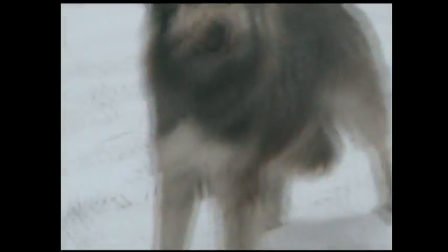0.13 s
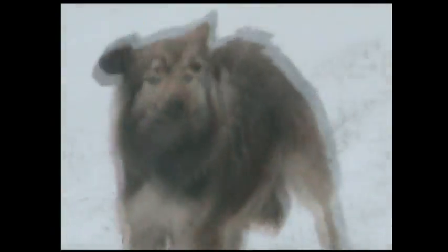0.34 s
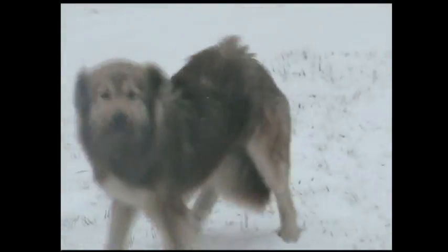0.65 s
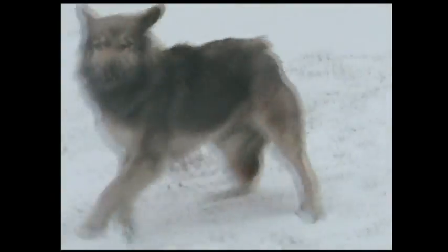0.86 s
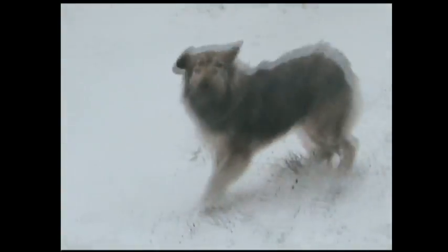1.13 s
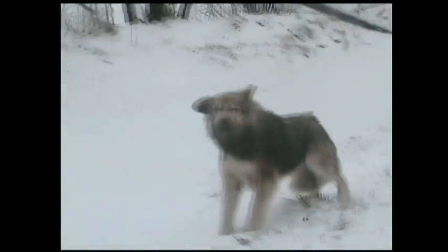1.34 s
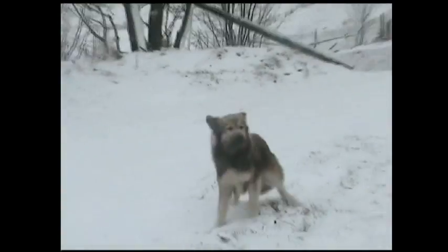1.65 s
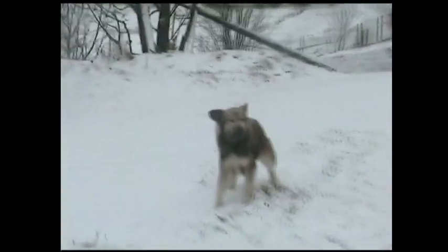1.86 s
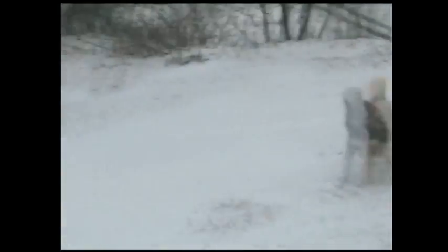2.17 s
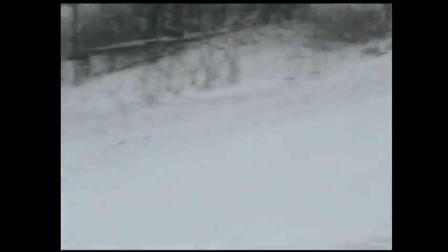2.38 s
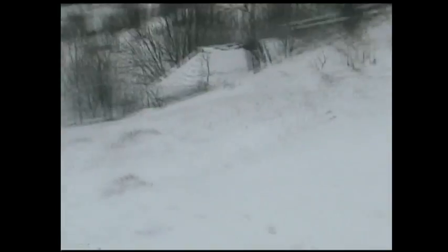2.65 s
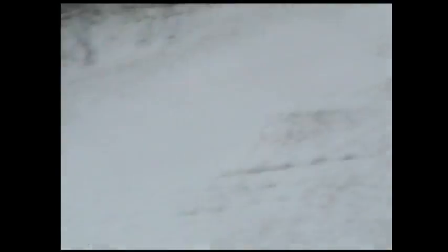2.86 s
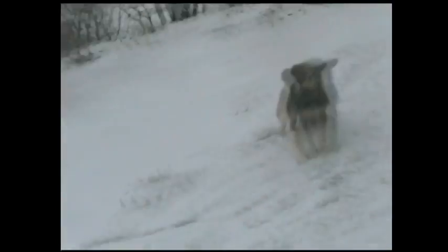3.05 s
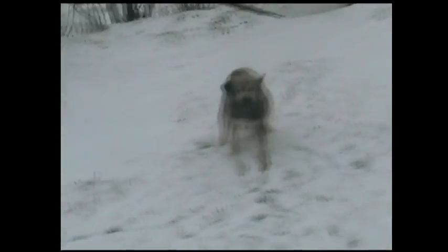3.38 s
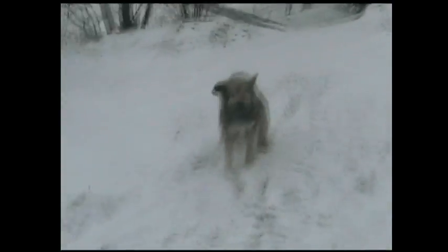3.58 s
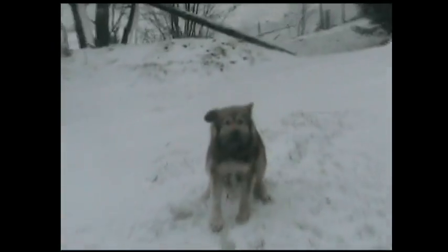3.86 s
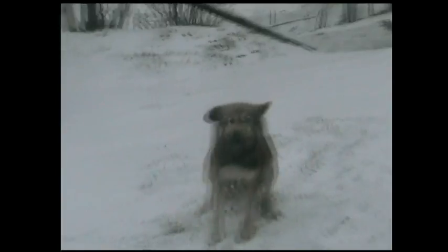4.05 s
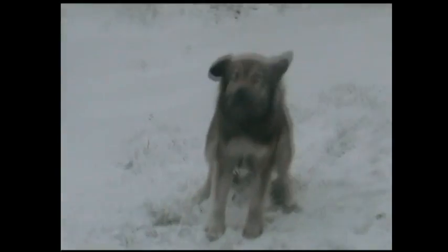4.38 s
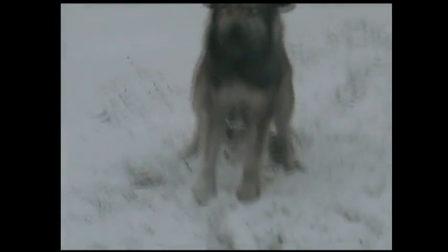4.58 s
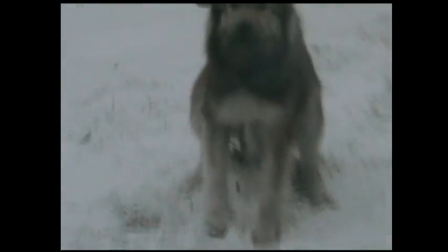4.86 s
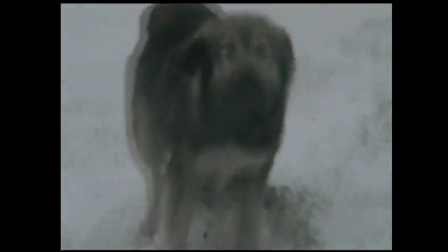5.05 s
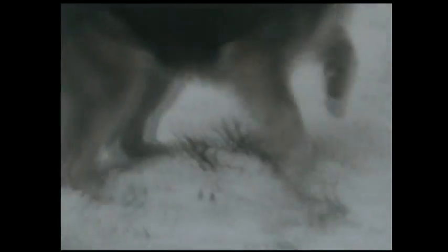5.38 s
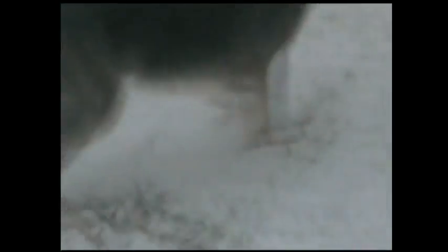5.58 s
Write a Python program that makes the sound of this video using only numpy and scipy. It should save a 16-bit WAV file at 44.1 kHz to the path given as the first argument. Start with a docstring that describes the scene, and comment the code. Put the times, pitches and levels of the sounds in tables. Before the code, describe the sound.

Close, dry outdoor sound on a snowy slope, through a small handheld camera microphone. A low moan leads straight into a hoarse, throaty bark at 0.1 s. The same big dog barks again at about 0.9, 1.8, 2.8, 3.5, 4.5 and 5.3 s, each a fifth of a second or less, pitch jumping up and falling, with a gritty edge. Quiet growls rumble near 1.2 to 1.9, 2.3 to 2.8 and 3.9 to 4.3 s; a soft moan precedes the 4.5 s bark. A clearer-voiced second dog fires six quick barks from 2.2 to 3.5 s, overlapping the first, with a soft yelp-like ring near 2.6 s. Paws crunch lightly in snow, and scattered ticks and knocks sound. Wind rumbles low, with a strong buffet at 3.1 s. Faint hiss and thin motor whine duck under the barks; echoes are weak and dull.

```python
"""Snowy slope: two large dogs bark in volleys, growl and moan a few metres from a hand-held camera. Voices are
fold pulses and breath noise through throat resonances; snow, fence and slope return echoes. Paws crunch (noise
crackle), wind rumbles in both microphone ports (shaped noise), short ringing noise bursts make ticks, knocks,
bright crackles and one soft yelp-like ring, and the camera drive whines (steady tones); gain control lowers the
whole sound after loud moments."""
import sys
import numpy as np
from scipy import signal
from scipy.io import wavfile
from scipy.ndimage import uniform_filter1d

SR = 44100
rng = np.random.default_rng(int(sys.argv[2]) if len(sys.argv) > 2 else 0)


def output_pcm(signal):
    """Save a mono or channel-first signal as 16-bit PCM at the path in sys.argv[1].

    Samples are clipped to [-1, 1] before scaling.
    """
    pcm = np.clip(np.atleast_2d(signal).T, -1, 1) * 32767
    wavfile.write(sys.argv[1], SR, np.round(pcm).astype(np.int16))


N = 252252


def gain_of(db):
    """Decibels to gain."""
    return 10 ** (np.asarray(db) / 20)


def evened(x):
    """Scales to rms 1."""
    return x / np.sqrt(np.mean(x ** 2) + 1e-20)


def steady(x):
    """Evens the loudness over 20 ms."""
    return x / np.sqrt(uniform_filter1d(x ** 2, size=900, mode="reflect") + 1e-9)


def slow_noise(n, size):
    """Noise smoothed over size samples, rms 1."""
    return evened(uniform_filter1d(rng.standard_normal(n), size=size))


def read(points, hz):
    """Reads a spectrum on a log-frequency axis."""
    f, value = np.transpose(points)
    return np.interp(np.log(hz + 1), np.log(f + 1), value)


def since(start_s, curve):
    """Columns of a curve with its times counted from start_s."""
    times, values = np.transpose(curve)
    return times - start_s, values


def add(mix, start_s, sound):
    """Mixes a sound in at start_s."""
    part = mix[..., round(max(start_s, 0) * SR):][..., :sound.shape[-1]]
    part += sound[..., :part.shape[-1]]


def resonate(x, hz, width_hz):
    """Shifts the curve hz down to zero, smooths twice, shifts back: a steep resonance."""
    turn = np.exp(2j * np.pi * np.cumsum(hz * np.ones(len(x))) / SR)
    r = np.exp(-np.pi * width_hz / SR)
    smoothed = signal.lfilter([(1 - r) ** 2], [1, -2 * r, r * r], x / turn + 1e-18)
    return 2 * (turn * smoothed).real


def tract(drive, modes, mouth):
    """Parallel resonances of alternating sign, moved by the mouth."""
    total = 0
    for k, (hz, width_hz, db) in enumerate(modes):
        total = total + (-1) ** k * gain_of(db) * resonate(drive, hz * mouth, width_hz)
    return total


def coloured(points, same, patchy_db, size):
    """Stereo noise from random short-time spectra with drifting patches; same = port correlation."""
    frames, hz = 4 * N // size + 5, np.fft.rfftfreq(size, 1 / SR)
    a, b, c, d, patches = rng.standard_normal((frames, len(hz), 5)).T
    patches = uniform_filter1d(patches, size=6, axis=0)
    patches = evened(uniform_filter1d(patches, size=6, axis=1))
    left, same = a + 1j * b, np.clip(same, 0, 1)
    right = same * left + np.sqrt(1 - same ** 2) * (c + 1j * d)
    spectra = np.array([left, right]) * gain_of(read(points, hz)[:, None] + patchy_db * patches)
    return evened(signal.istft(spectra, nperseg=size, noverlap=size * 3 // 4)[1][:, :N])


def panned(x, pan_db):
    """Two channels that differ by pan_db."""
    return np.array([x * gain_of(pan_db / 2), x * gain_of(-pan_db / 2)])


def heard_from(x, pan_db, scatter_db):
    """The camera body scatters treble differently into the two ports."""
    decaying = rng.standard_normal(240) * np.exp(-np.arange(240) / 60)
    taps = signal.lfilter([1, -.86], [1], decaying)
    side = gain_of(scatter_db) * signal.oaconvolve(x, taps / np.linalg.norm(taps))[:N]
    side -= x * (side @ x) / (x @ x)  # scatter alone pulls to neither port
    return panned(x, pan_db) + np.array([side, -side])


def folds(hz, rough, weak, jitter, top_hz, dull_db, spread):
    """Vocal-fold pulses, uneven in time and size, every second one weaker, with a puff of noise per cycle."""
    n = len(hz)
    wobble, shimmer = slow_noise(n, 80), slow_noise(n, 80)
    turns = np.cumsum(hz * (1 + jitter * (rough + 0.282 * weak) * wobble)) / SR
    k = np.arange(1, int(top_hz / hz.min()))[:, None]
    slope_db = -dull_db * np.log2(k * hz / 600)  # dB lost per octave
    knots = rng.standard_normal((len(k), n // 600 + 2))
    drift = np.array([np.interp(np.arange(n) / 600, np.arange(len(row)), row) for row in knots])
    # partials swell and fade one by one, the upper ones most
    slope = gain_of(slope_db + np.minimum(1.4 * k, 4.5) * drift) * (k * hz < top_hz)
    partials = np.cos(2 * np.pi * k * turns + spread * k ** 2) * slope
    pulses = partials.sum(0) * np.sqrt(hz / top_hz * 2)
    pulses *= (1 + np.clip(weak, 0, 1.5) * np.cos(np.pi * turns)) * (1 + rough * shimmer)
    puffs = evened((0.54 + np.exp(-(turns % 1) / 0.69)) * rng.standard_normal(n))
    rough = np.clip(rough, 0, 1)
    return (1 - rough) * pulses + rough * puffs, puffs


SLIP_AT_HZ, SLIP_HZ = 458.3, 51.3  # the falling voice slips down a step here
SHUT, OPENING_S = 0.94, 0.068  # the mouth opens from this share
RASP_FOLLOWS, RASP_SHARE = .12, .5  # power of the pitch; share of the loss of effort
RELEASE_DB = -10  # last fade


def arch(effort, rise, fall, first_hz, top_hz, last_hz, break_s, break_hz, bends, db_per_octave):
    """Time from the top, pitch, effort, mouth, rasp glide and loss of rasp: up, a break upward, over, down."""
    t = np.arange(-rise, fall, 1 / SR)
    up, down = np.clip(-t / rise, 0, 1), np.clip(t / fall, 0, 1)
    hz = top_hz - (top_hz - first_hz) * up ** bends[0] - (top_hz - last_hz) * down ** bends[1]
    hz -= break_hz * (t < -break_s) * (t + rise) / (rise - break_s)
    slipped = (t > 0) * (hz < SLIP_AT_HZ)
    hz -= SLIP_HZ * slipped * (hz - last_hz) / max(SLIP_AT_HZ - last_hz, SLIP_HZ)
    s, db = effort
    end_s = max(rise + fall, s[-1] + 0.0009)
    effort_db = np.interp(t + rise, [*s, end_s], [*db, db[-1] + RELEASE_DB])
    effort_loss_db = uniform_filter1d(effort_db, size=1300, mode="nearest") - db.max()
    fade_db = db_per_octave * np.log2(hz / top_hz) + RASP_SHARE * effort_loss_db
    opening = 1 - (1 - SHUT) * np.exp(-(t + rise) / OPENING_S)
    return t, hz, effort_db, opening, (hz / top_hz) ** RASP_FOLLOWS, fade_db


ONSET_ROUGH, TIRED_ROUGH = .16, .33


def frayed(t):
    """Extra roughness at the start and the end of a bark."""
    return np.where(t < 0, ONSET_ROUGH * (t / t[0]) ** 2, TIRED_ROUGH * (t / t[-1]) ** 3)


# resonances behind the teeth: (centre [Hz], width [Hz], level [dB])
TEETH_MODES = [(4094, 270, 6), (5220, 610, 15.5), (6130, 150, 11.5), (6774, 680, 13.5)]
# breath through the lips: (centre [Hz], width [Hz], level [dB])
LIP_MODES = [(8600, 11200, -4.5), (15600, 1400, -19)]
MOUTH_PASS_HZ = (360, 3400)  # little outside this leaves the throat
HISS_SAG_DB_PER_S = 43  # the breath runs out


def voice(effort_db, hz, rough, weak, mouth, teeth, rasp_db, throat, breathy, hiss_db,
          top_hz=9500, lift_db=0, dull_db=0):
    """Pulses pass a throat that opens and shuts; a breathier share rasps past the teeth in patches."""
    n = len(hz)
    hz = uniform_filter1d(hz, size=150, mode="nearest")  # muscles round off the pitch
    # slack folds close softly and sound duller
    slack_db = dull_db + .22 * np.clip(-12 - effort_db, 0, 22)
    drive, puffs = folds(hz, rough, weak, jitter=.14, top_hz=top_hz, dull_db=slack_db, spread=.3)

    (low_hz, low_width_hz, low_db), *upper = TEETH_MODES
    rings = [(low_hz, low_width_hz, low_db + lift_db), *upper]
    rasp_gusts, hiss_gusts = slow_noise(n, 500), slow_noise(n, 500)
    rasp = steady(tract(drive + (breathy + 1.5 * rough) * puffs, rings, teeth))
    rasp *= gain_of(3 * rasp_gusts)
    sag_db = HISS_SAG_DB_PER_S * np.arange(n) / SR
    hiss = tract(puffs, LIP_MODES, teeth) * gain_of(hiss_db + 3.5 * hiss_gusts - sag_db)

    mouth_band = signal.butter(3, MOUTH_PASS_HZ, "band", fs=SR, output="sos")
    radiated = signal.sosfilt(mouth_band, tract(drive, throat, mouth))
    sound = gain_of(effort_db) * steady(radiated) + gain_of(rasp_db) * (rasp + hiss)
    return sound * signal.windows.tukey(n, 900 / n)


# throat at mouth factor 1: (centre [Hz], width [Hz], level [dB])
HOARSE_THROAT = [(361, 127, -4), (650.5, 149.5, 12.5), (982, 154, 13.5), (1174, 244, 10), (1834, 452, 4),
                 (2357, 596, -2.5), (3307, 510, -7.5)]
HOARSE_BENDS = (1.9, 1.9)  # powers that flatten the pitch arch toward its top, up and down
HOARSE_RASP_DB_PER_OCTAVE = 12  # the rasp dies as the pitch leaves its top
HOARSE_HISS_DB = 0  # breath at the lips against the rasp
HOARSE_ROUGH, WEAK_FLOOR = .09, .04
WEAK_FLUTTER_DB = 3  # the weakening comes in bursts


def hoarse_bark(effort, *row):
    """Around the top every second pulse weakens; both ends fray."""
    *shape, weak, weak_s, half_length_s, mouth, teeth, rasp_db, dull_db = row
    t, hz, effort_db, opening, glide, fade_db = arch(
        effort, *shape, HOARSE_BENDS, HOARSE_RASP_DB_PER_OCTAVE)
    flutter = gain_of(WEAK_FLUTTER_DB * slow_noise(len(t), 300))
    span = np.exp(-((t - weak_s) / half_length_s) ** 6)  # sets in and stops abruptly
    weak = WEAK_FLOOR + weak * span * flutter
    rough = HOARSE_ROUGH + frayed(t) + .11 * weak
    return voice(effort_db, hz, rough, weak, mouth * opening, teeth * glide, rasp_db + fade_db,
                 HOARSE_THROAT, .5, HOARSE_HISS_DB, dull_db=dull_db)


# (start [s], rise [s], fall [s], first pitch [Hz], top pitch [Hz], last pitch [Hz],
#  voice break before the top [s], its leap [Hz], every-second-pulse weakening [0-1],
#  its centre from the top [s], its half length [s], mouth opening [factor],
#  rasp pitch [factor], rasp at the top [dB], base dullness [dB per octave])
HOARSE_BARKS = [ (0.08, 0.091, 0.11, 258.3, 547.8, 244.5, 0.0036, 70, 0.06, -0.012, 0.014, 0.95, 1.11, -32.5, 1),
                (0.857, 0.084, 0.089, 322.2, 597, 321.6, 0.0029, 39, 0.9, -0.021, 0.036, 0.98, 1.024, -35.5, 3),
                (1.813, 0.067, 0.088, 324, 598.5, 394, 0.022, 48, 0.84, 0.014, 0.035, 1.002, 1.09, -33.5, 1.5),
                (2.798, 0.087, 0.062, 357, 639.5, 453, 0.022, 69, 0.78, 0.027, 0.053, 1.057, 1.056, -34.5, 0.5),
                (3.539, 0.072, 0.092, 292.6, 623.5, 310, 0.054, 6.7, 0.75, 0.0055, 0.056, 0.974, 1.04, -33, -0.8),
                (4.494, 0.088, 0.099, 235.3, 612.7, 274.4, 0.012, 5.4, 0.65, 0.0075, 0.017, 0.97, 1.03, -33, 1.4),
                (5.292, 0.069, 0.1, 283, 601.4, 304.5, 0.032, 36.5, 0.63, 0.0063, 0.047, 0.95, 1.02, -32.5, 1.5),
                ]
# effort, one curve per bark: (time [s], level [dB])
HOARSE_EFFORT = [
    [(0.088, -46), (0.108, -19.5), (0.158, -7.5), (0.172, -16.5), (0.2, -13.5), (0.242, -22.5),
     (0.272, -45)],
    [(0.864, -37), (0.87, -24.5), (0.896, -15.5), (0.946, -16.5), (0.99, -12.5), (1.02, -32.5)],
    [(1.817, -35), (1.831, -6), (1.893, -9), (1.923, -25), (1.941, -21), (1.968, -35)],
    [(2.804, -21), (2.812, -18), (2.83, -16.5), (2.858, -12.5), (2.868, -19.5), (2.897, -10.5),
     (2.925, -23), (2.94, -34)],
    [(3.546, -16.5), (3.554, -18.5), (3.56, -17), (3.632, -8.5), (3.656, -22), (3.692, -29.5)],
    [(4.496, -45.5), (4.518, -16), (4.564, -9), (4.626, -10.5), (4.678, -36.5)],
    [(5.296, -28.5), (5.31, -16.5), (5.362, -9.5), (5.424, -16), (5.466, -34)],
]


def hoarse_dog():
    """Volley of hoarse barks, each an arch of pitch driven by its own effort."""
    out = np.zeros(N)
    for (start_s, *row), effort in zip(HOARSE_BARKS, HOARSE_EFFORT):
        add(out, start_s, hoarse_bark(since(start_s, effort), *row))
    return out


# throat at mouth factor 1: (centre [Hz], width [Hz], level [dB])
CLEAR_THROAT = [(350, 106, -7), (533, 96, 5), (1017, 177, 13.5), (1404, 183, 10), (2010, 1100, -11),
                (2865, 237, -5)]
CLEAR_BENDS = (1.6, 1.4)  # powers of the pitch arch, up and down
CLEAR_RASP_DB_PER_OCTAVE, CLEAR_HISS_DB = 21, -5.5
CLEAR_ROUGH, CLEAN_S = .1, .035  # cleaner for CLEAN_S around the top
CLEAN_SHARE = .65  # of the base roughness lost at the top


def clear_bark(effort, *row):
    """The voice breaks upward shortly before the top and rings cleaner there."""
    *shape, mouth, teeth, rasp_db, lift_db = row
    t, hz, effort_db, opening, glide, fade_db = arch(
        effort, *shape, CLEAR_BENDS, CLEAR_RASP_DB_PER_OCTAVE)
    clean = CLEAN_SHARE * np.exp(-(t / CLEAN_S) ** 2)
    rough = CLEAR_ROUGH * (1 - clean) + frayed(t)
    return voice(effort_db, hz, rough, 0, mouth * opening, teeth * glide, rasp_db + fade_db,
                 CLEAR_THROAT, .33, CLEAR_HISS_DB, lift_db=lift_db)


# (start [s], rise [s], fall [s], first pitch [Hz], top pitch [Hz], last pitch [Hz],
#  voice break before the top [s], its leap [Hz], mouth opening [factor], rasp pitch [factor],
#  rasp at the top [dB], lift of the lowest rasp resonance [dB])
CLEAR_BARKS = [ (2.198, 0.094, 0.076, 309, 659.4, 282, 0.051, 60, 0.97, 0.91, -29.5, 7),
               (2.428, 0.091, 0.095, 292, 554, 354.5, 0.038, 49, 0.91, 1, -36, 4),
               (2.643, 0.095, .08, 404.6, 539, 360.8, 0.0402, 30, 0.907, 0.97, -37.5, 6),
               (2.924, 0.041, 0.097, 504, 547.5, 272, 0.0076, 13.7, 0.93, 1, -38.5, 11),
               (3.106, 0.074, 0.11, 266, 543, 265.3, 0.0192, 60, 0.936, 0.97, -38.5, 0),
               (3.436, 0.083, 0.11, 289, 569.6, 457, 0.026, 57, 0.95, 0.92, -37, -1), ]
# effort, one curve per bark: (time [s], level [dB])
CLEAR_EFFORT = [
    [(2.203, -30), (2.211, -24), (2.237, -13), (2.257, -17), (2.293, -16), (2.337, -24.5), (2.347, -28),
     (2.355, -34.5)],
    [(2.432, -36), (2.448, -29), (2.46, -24.5), (2.478, -14), (2.544, -24.5), (2.572, -21), (2.605, -35.5)],
    [(2.65, -40), (2.694, -15), (2.752, -24.5), (2.782, -15.5), (2.795, -26.5), (2.812, -25)],
    [(2.94, -20.5), (2.976, -28), (3.006, -17.5), (3.022, -27), (3.032, -28), (3.08, -32.5)],
    [(3.11, -19), (3.116, -28.5), (3.126, -27), (3.164, -15), (3.192, -21.5), (3.224, -15), (3.232, -24.5),
     (3.248, -28), (3.28, -39)],
    [(3.44, -37), (3.458, -24.5), (3.468, -27), (3.494, -16.5), (3.542, -21)],
]


def clear_dog():
    """Volley of clear barks, each an arch of pitch driven by its own effort."""
    out = np.zeros(N)
    for (start_s, *row), effort in zip(CLEAR_BARKS, CLEAR_EFFORT):
        add(out, start_s, clear_bark(since(start_s, effort), *row))
    return out


# nearly shut mouth: (centre [Hz], width [Hz], level [dB])
GROWL_THROAT = [(450, 890, -19), (668, 190, -5.5), (1337, 400, -4.5), (2338, 350, -2), (3630, 990, -11.5)]
GROWL_ROUGH, HUM_HZ = .2, 120


def growl(length_s, first_db, last_db, first_rate, last_rate, hum_db):
    """Slow uneven pulses through a nearly shut mouth, over a wavering chest hum."""
    level_db = np.linspace(first_db, last_db, round(length_s * SR))
    n = len(level_db)
    stumble = np.exp(.08 * np.clip(slow_noise(n, 1000), -1.3, 3))
    rate = np.linspace(first_rate, last_rate, n) * stumble
    drive = folds(rate, GROWL_ROUGH, 0, jitter=0.367, top_hz=3750, dull_db=7.0, spread=0)[0]
    rumble = evened(tract(drive * stumble ** 4, GROWL_THROAT, 1.0))
    hum = evened(resonate(rng.standard_normal(n), HUM_HZ, 18.0)) * signal.windows.tukey(n, .6)
    return gain_of(level_db) * rumble * signal.windows.tukey(n, .08) + gain_of(hum_db) * hum


# (start [s], length [s], first level [dB], last level [dB], first rate [pulses/s],
#  last rate [pulses/s], chest hum [dB])
GROWLS = [(1.237, 0.34, -47, -51.5, 42.5, 50.5, -58), (1.499, 0.37, -50.5, -54.5, 55, 44, -51),
          (2.332, 0.44, -42, -38, 60.3, 54, -44.5), (3.887, 0.22, -42.5, -51.5, 64, 81, -50),
          (4.108, 0.19, -43, -53.5, 42, 32, -53)]


def growls():
    """Growls between and under the barks, in the place of the hoarse dog."""
    out = np.zeros(N)
    for start_s, *row in GROWLS:
        add(out, start_s, growl(*row))
    return out


# half-shut mouth: (centre [Hz], width [Hz], level [dB])
MOAN_THROAT = [(436, 180, -2), (1053, 480, -3.5), (1780, 430, -4), (2220, 510, -6)]
MOAN_ROUGH, MOAN_RASP_DB = .22, -51  # rasp against the moan's level


def moan(length_s, first_hz, last_hz, first_db, last_db, mouth, top_hz):
    """A soft low note through a half-shut mouth."""
    level_db = np.linspace(first_db, last_db, round(length_s * SR))
    hz = np.linspace(first_hz, last_hz, len(level_db))
    return voice(level_db, hz, MOAN_ROUGH, 0, mouth, 1, level_db + MOAN_RASP_DB,
                 MOAN_THROAT, 1, HOARSE_HISS_DB, top_hz=top_hz)


# (start [s], length [s], first pitch [Hz], last pitch [Hz], first level [dB], last level [dB],
#  mouth opening [factor], highest partial [Hz])
MOANS = [(0, 0.13, 183.2, 195.6, -39.5, -43, 1.01, 1150), (4.346, .165, 129.4, 171.6, -48, -41, 1.07, 2840)]


def moans():
    """Low moans of the hoarse dog ahead of a bark."""
    out = np.zeros(N)
    for start_s, *row in MOANS:
        add(out, start_s, moan(*row))
    return out


# snow, fence and slope: (time [s], level [dB]) before the treble loss
ECHOES = [(.006, -20.5), (.09, -30), (0.236, -37)]


def outdoors(x):
    """A few echoes and a diffuse tail, other tail taps in each channel."""
    t = np.arange(SR // 2) / SR
    taps = rng.standard_normal((2, len(t))) * gain_of(-60 * t / .5) * (t > .02)
    taps *= gain_of(-27) / np.linalg.norm(taps[0])
    for delay_s, db in ECHOES:
        taps[:, round(delay_s * SR)] += gain_of(db)
    far = signal.lfilter([.015], [1, -1.76, .775], taps)  # snow and distance dull the returns
    return signal.fftconvolve(x[None], far, axes=1)[:, :N]


# crackle spectrum: (frequency [Hz], relative density [dB per Hz])
CRUNCH = [(290, -0.5), (500, 2.5), (914, -0.5), (1250, -1), (1650, -1.5), (3960, -10), (15500, -21.5)]
# paws shuffling in snow: (start [s], length [s], level [dB])
STEPS = [(0.616, 0.12, -45.5), (1.474, 0.23, -47.5), (1.96, 0.11, -51), (2.538, 0.12, -47.5),
         (3.229, 0.25, -45.5), (3.653, 0.1, -53), (4.03, 0.1, -54), (5.4, 0.15, -46.5), (5.601, 0.14, -48)]


def steps():
    """Snow crystals break in a dense uneven crackle under each paw."""
    breaks = rng.random(N) < 500 / SR  # 500 per second on average
    size = gain_of(1.3 * np.minimum(rng.exponential(1, N), 5)) * breaks
    envelope = evened(1 + signal.lfilter([1], [1, -.98], size))
    crackle = coloured(CRUNCH, .5, 2.5, size=512) * envelope
    weight = np.zeros(N)
    for start_s, length_s, db in STEPS:
        add(weight, start_s, gain_of(db) * signal.windows.tukey(round(length_s * SR), .5))
    return crackle * weight


# short ringing noise bursts: ticks, knocks, bright crackles and one soft yelp-like ring:
# (time [s], peak before panning [dB], centre [Hz], width [Hz], burst t60 [s])
BURSTS = [(0.341, -28.5, 2020, 1730, 0.016), (0.341, -33, 1410, 161, 0.03), (0.389, -44, 2100, 500, 0.019),
          (0.476, -27.5, 950, 1650, 0.03), (.737, -24.5, 2680, 3530, 0.019),
          (0.818, -21.5, 690, 885, 0.012), (1.22, -24, 465, 637, 0.015), (1.464, -31, 486, 900, 0.057),
          (1.551, -28.5, 2400, 3180, 0.022), (1.773, -37, 890, 1500, 0.0098),
          (2.573, -38, 9100, 11000, 0.0096), (2.602, -35, 8000, 10000, .012),
          (2.619, -26.5, 1050, 1320, 0.37), (2.638, -33, 1530, 140, 0.14), (2.685, -36, 11200, 14000, .012),
          (3.805, -29.5, 636, 1140, 0.02), (3.851, -39, 2300, 1240, 0.013),
          (3.872, -27.5, 2410, 3970, 0.018), (3.887, -24, 3020, 3900, 0.015),
          (4.47, -33, 10600, 7000, 0.018), (4.761, -40, 8000, 12000, 0.03), (4.88, -32, 900, 1910, 0.011),
          (4.894, -29, 474, 1185, 0.049), (5.479, -40, 9000, 12000, .012), (5.567, -25.5, 557, 744, 0.058)]


def ringing_bursts():
    """Each is a short burst of noise through one resonance."""
    out, t = np.zeros(N), np.arange(2000) / SR
    for start_s, db, hz, width_hz, t60_s in BURSTS:
        burst = rng.standard_normal(len(t)) * gain_of(-60 * t / max(t60_s, .003))
        ring = resonate(burst, hz, width_hz) + 0.014 * burst
        add(out, start_s, gain_of(db) * ring / abs(ring).max())
    return heard_from(out, 0.28, -11.5)


# rumble: (time [s], level [dB])
WIND = [(0.0, -35.5), (0.558, -54.5), (0.84, -40), (0.99, -49.5), (1.58, -42), (2.01, -51), (2.561, -44),
        (2.93, -42.5), (3.14, -30.5), (3.25, -35), (3.68, -55), (3.9, -51.5), (4.3, -44.5), (4.78, -44),
        (5.26, -52), (5.72, -38)]
# rumble spectrum: (frequency [Hz], relative density [dB per Hz])
WIND_COLOUR = [(8.8, -53), (15, -4.5), (86, 0), (146, -6), (223, -9.5), (295, -13.5), (378, -88),
               (500, -53), (650, -51), (1100, -120)]
# gusts that slap the ports: (start [s], length [s], mean level of the ports [dB])
BUFFETS = [(.0, 0.089, -53), (0.789, 0.05, -39.5), (3.087, 0.088, -25.5), (4.719, 0.051, -45)]


def wind():
    """Lumpy low turbulence, loosely related in the two ports; sudden gusts flutter higher."""
    s, db = np.transpose(WIND)
    t, slaps, same = np.arange(N) / SR, np.zeros(N), .3
    for start_s, length_s, slap_db in BUFFETS:
        add(slaps, start_s, gain_of(slap_db) * signal.windows.tukey(round(length_s * SR), .5))
    flutter = coloured([(30, -7.5), (150, 6), (350, -3), (700, -36.5)], same, 2.7, size=1024)
    rumble = coloured(WIND_COLOUR, same, 3.7, size=2048)
    return rumble * gain_of(np.interp(t, s, db)) + slaps * flutter * gain_of([[-2.], [2.]])


# steady drive tones: (frequency [Hz], rms level [dB])
WHINE = [(598, -65), (1798, -66), (2998, -70), (2697, -68), (3300, -69), (3601, -72), (3898, -73),
         (4199, -71), (4500, -75), (4802, -76), (5356, -73), (6298, -75), (15622, -80)]
THROB_HZ, THROB_DB, THROB_PER_S = 5400, -67, 41.3  # a drive part that rings once a turn


def drive_motor():
    """Thin steady tones and one narrow noise ring that throbs once a turn."""
    t = np.arange(N) / SR
    tones = np.zeros(N)
    for hz, db in WHINE:
        tones += np.sqrt(2) * gain_of(db) * np.sin(2 * np.pi * (hz * t + rng.random()))
    beat = np.exp(2 * np.cos(2 * np.pi * THROB_PER_S * t))
    throb = gain_of(THROB_DB) * evened(beat * resonate(rng.standard_normal(N), THROB_HZ, 110))
    return np.array([tones + throb, tones + .5 * throb])


# air spectrum: (frequency [Hz], relative density [dB per Hz])
AIR = [(120, -19), (200, 3.5), (598, 6), (815, -2.5), (1170, 4.5), (2220, -1), (2620, 1.5), (5060, -9),
       (5440, -6.5), (7420, -12.5), (15700, -18.5)]
AIR_DB = -54


def open_air():
    """Constant faint stereo noise with drifting spectral patches."""
    return gain_of(AIR_DB) * coloured(AIR, .65, 3.0, size=1024)


def scene():
    """Dogs, their echoes and the background."""
    hoarse = hoarse_dog() + moans() + growls()
    clear = clear_dog()
    dogs = heard_from(hoarse, 0.73, -21.0) + heard_from(clear, 1.0, -4.5) + outdoors(hoarse + clear)
    return dogs + steps() + ringing_bursts() + wind() + drive_motor() + open_air()


def ducked(x):
    """Gain control: loud sound lowers everything at once, then the gain creeps back."""
    power_db = 10 * np.log10(abs(uniform_filter1d((x ** 2).mean(0), size=600)) + 1e-10)
    fall_db = np.arange(N) * 61.0 / SR  # the held level sinks 61 dB a second
    held_db = np.maximum.accumulate(power_db + fall_db) - fall_db
    over_db = np.maximum(held_db + 15.0, 0)
    return x / gain_of(0.91 * uniform_filter1d(over_db, size=200))


EDGE_HZ = 15800


def record(dry):
    """A notch of the microphone housing, gain control, soft overload, band limit."""
    notched = signal.lfilter(*signal.iirnotch(3720, 14, SR), dry)
    soft = 0.8 * np.tanh(ducked(notched) / 0.67)
    low_pass = signal.firwin(1023, EDGE_HZ, window=("kaiser", 9), fs=SR)
    return signal.oaconvolve(soft, low_pass[None], "same")


dry = scene()
out = record(dry)
output_pcm(out)
```